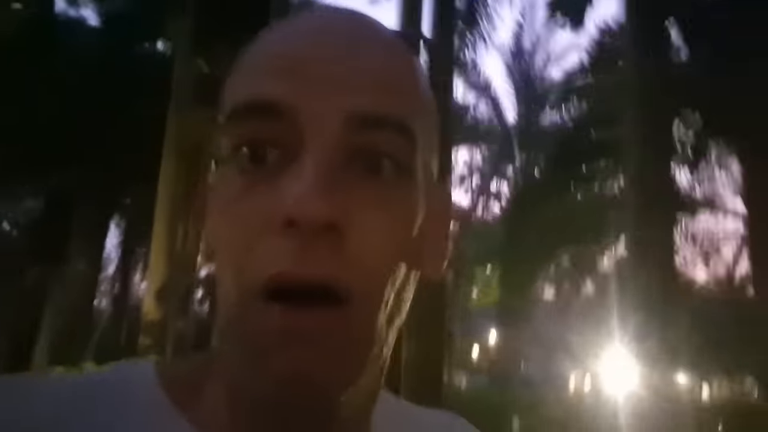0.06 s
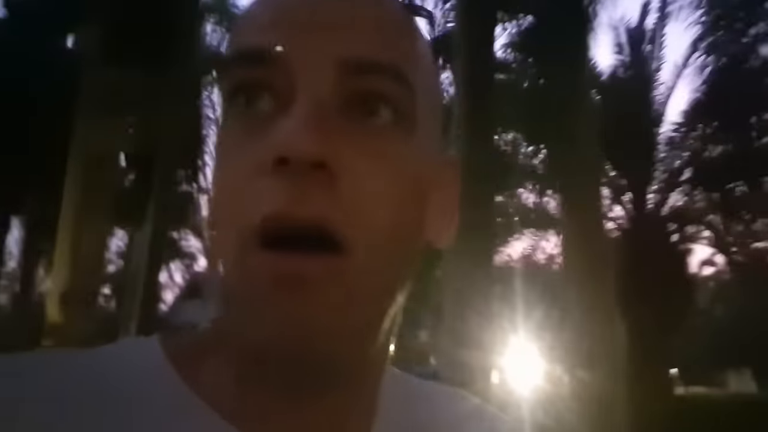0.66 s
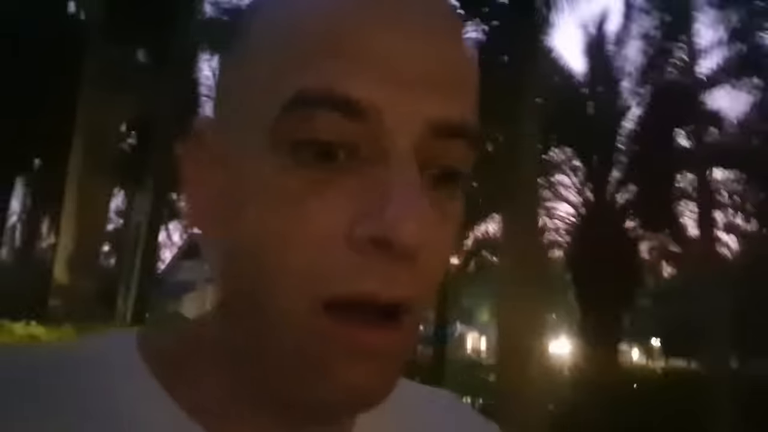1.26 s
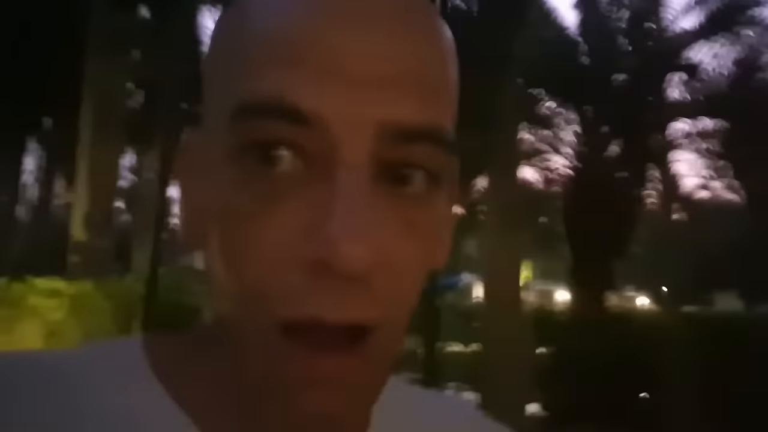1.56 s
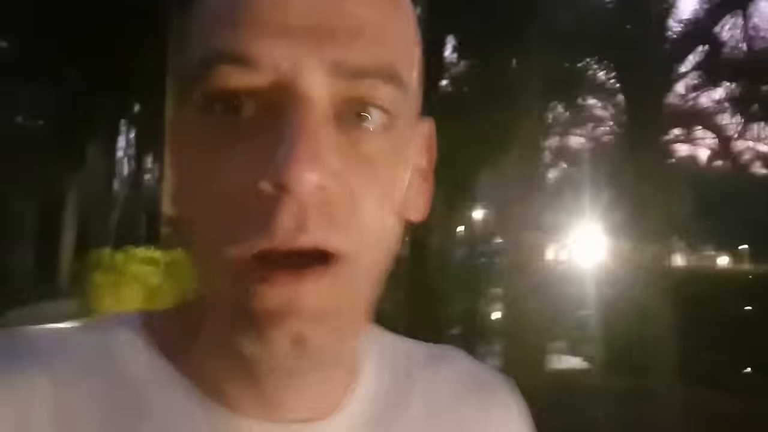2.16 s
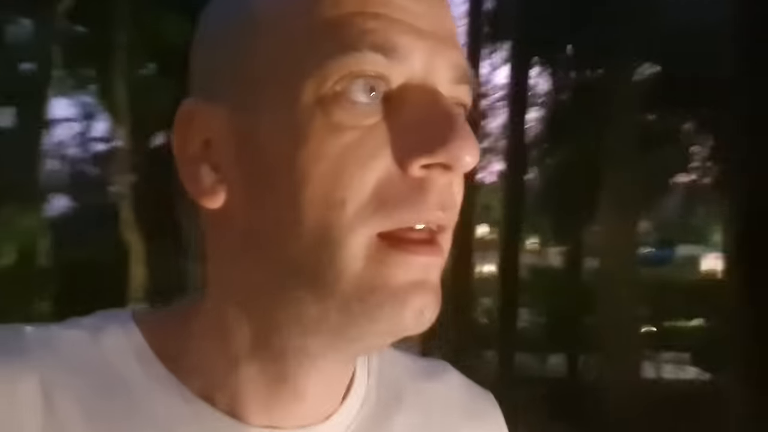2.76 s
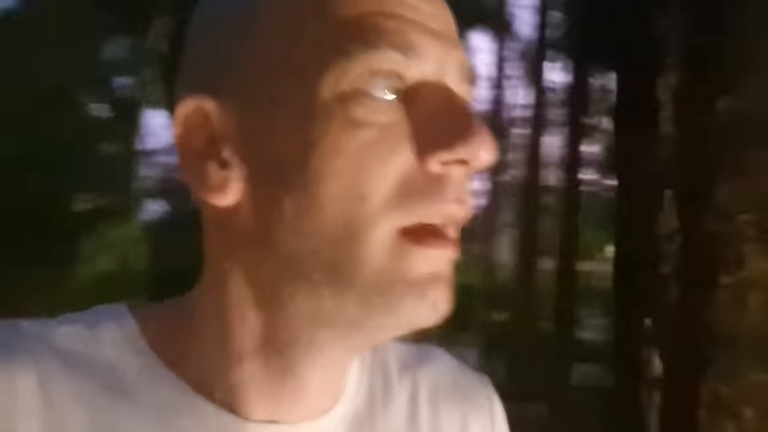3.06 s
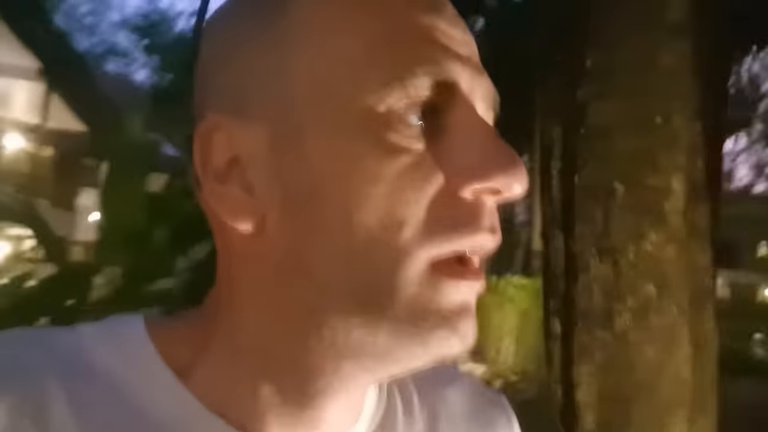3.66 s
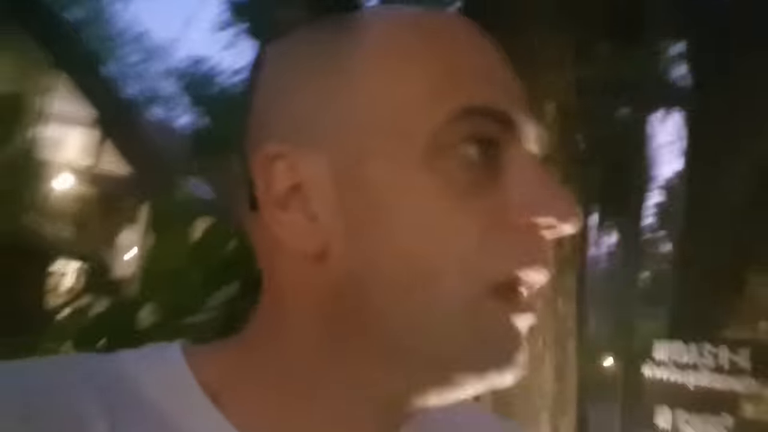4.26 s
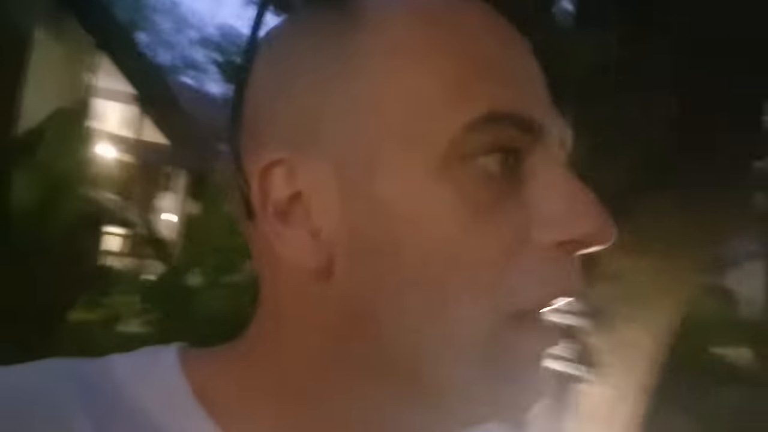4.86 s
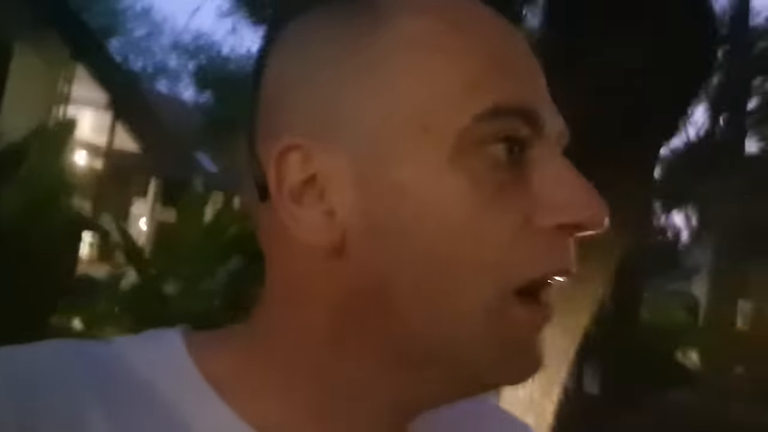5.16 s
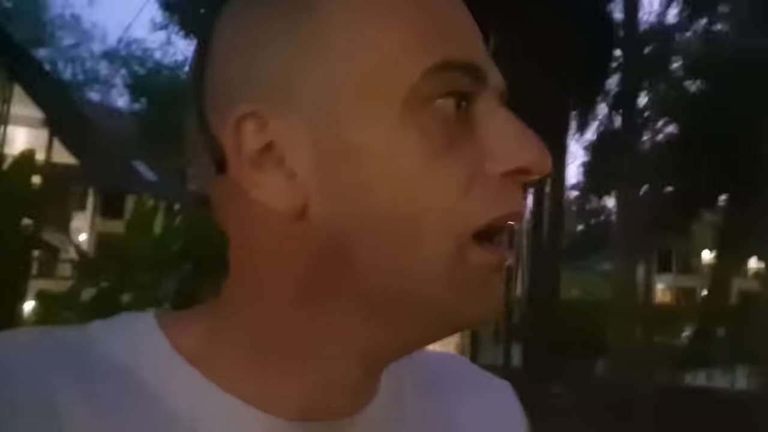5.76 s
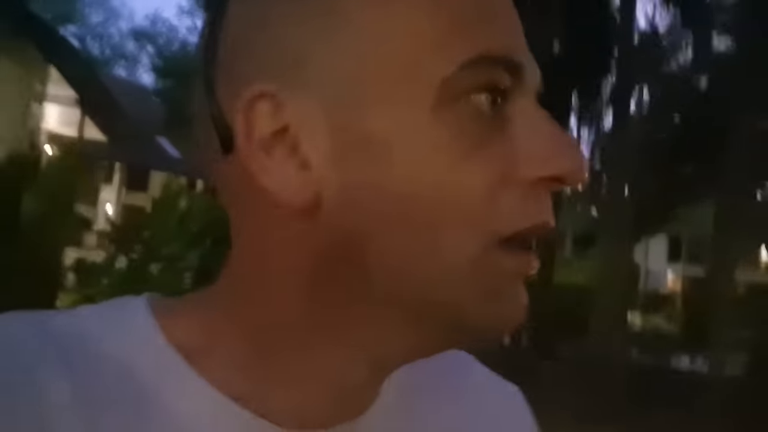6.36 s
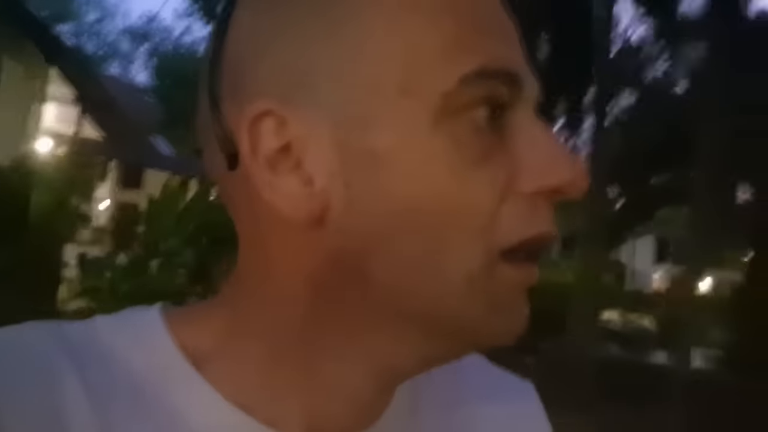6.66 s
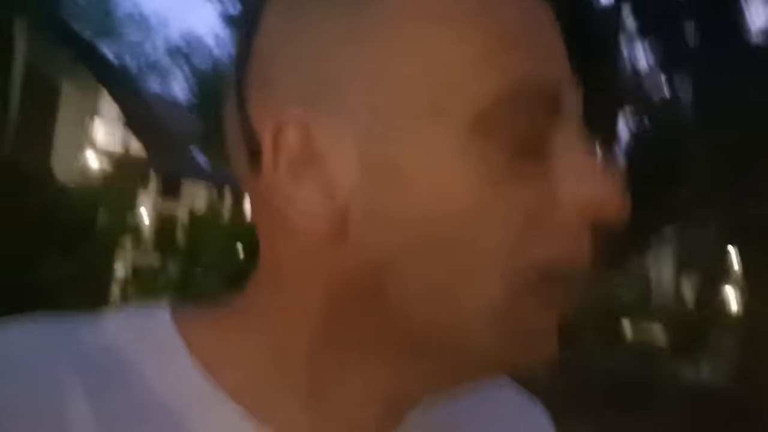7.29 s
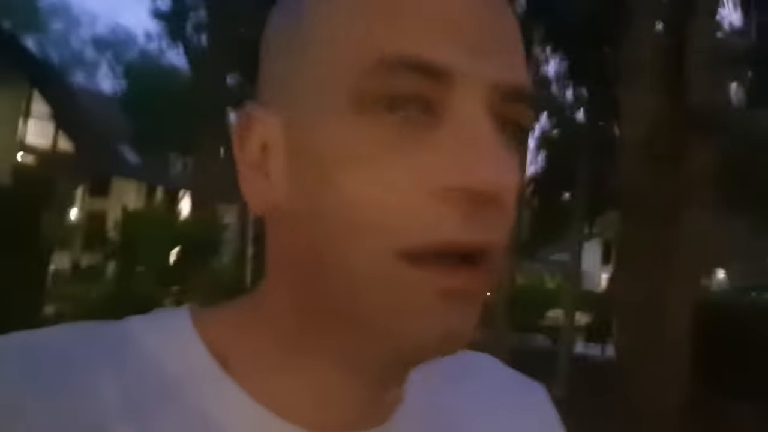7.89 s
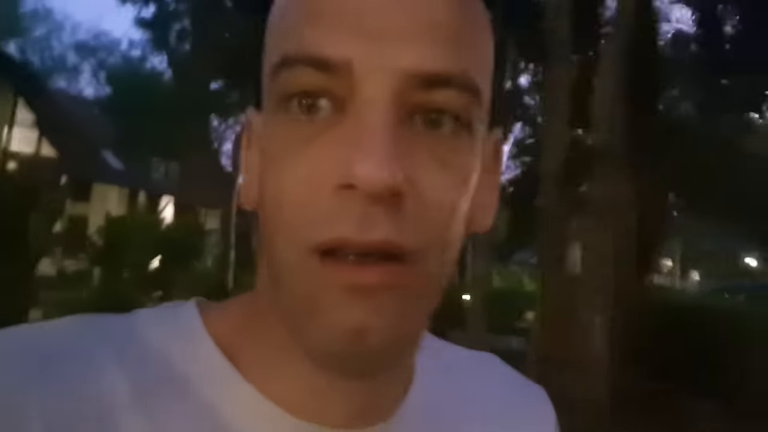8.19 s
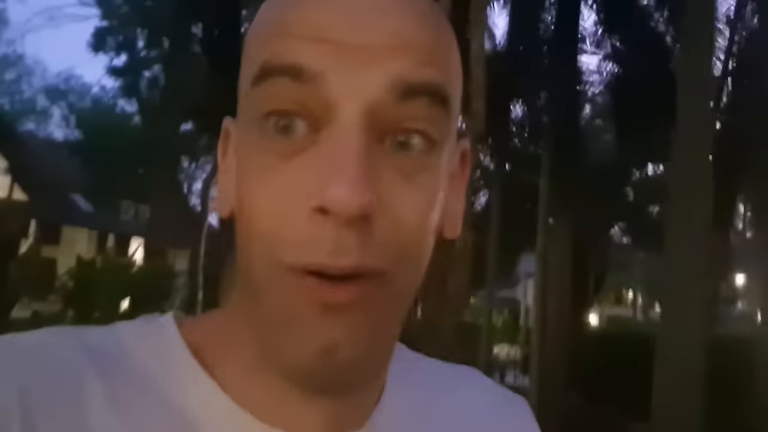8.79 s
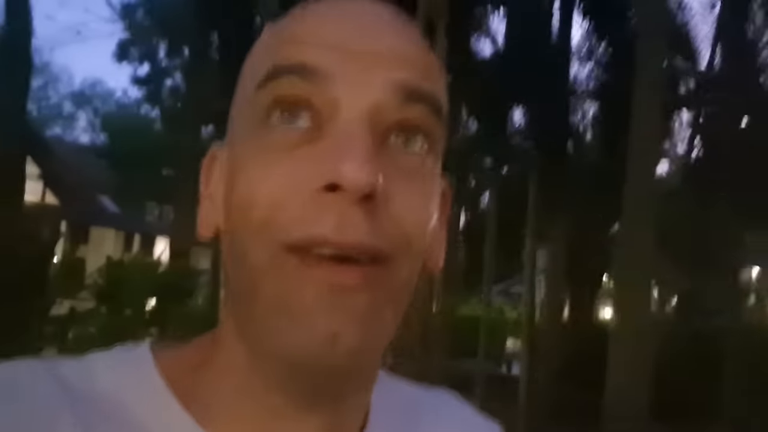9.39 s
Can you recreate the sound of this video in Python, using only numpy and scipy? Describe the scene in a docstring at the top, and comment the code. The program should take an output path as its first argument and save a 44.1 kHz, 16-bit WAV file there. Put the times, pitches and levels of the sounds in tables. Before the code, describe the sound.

Cicadas drone and sizzle loudly without a break, over soft footfalls, a faint hum and light microphone rumble.

```python
"""A dawn chorus of cicadas shrills from the trees all round someone walking a tropical garden with a phone.
Each insect buckles its tymbals hundreds of times a second and every click rings its hollow body.
Four kinds of singer stack up as drone, shrill, rasp and sizzle, and the trunks scatter their song.
Far below lie a mains hum, soft footfalls and a low background rumble, with deep swells of wind
or handling on the microphone."""
import sys
import numpy as np
from scipy import signal
from scipy.fft import rfft, irfft, next_fast_len
from scipy.io import wavfile
from scipy.ndimage import uniform_filter1d, map_coordinates

SR = 44100
rng = np.random.default_rng(int(sys.argv[2]) if len(sys.argv) > 2 else 0)


def pcm_store(signal):
    """Save signal as 16-bit PCM."""
    levels = np.round(np.clip(np.atleast_2d(signal), -1, 1) * 32767)
    wavfile.write(sys.argv[1], SR, levels.astype(np.int16).T)


N = 415863
T = np.arange(N) / SR
SIDES = np.array([[.5], [-.5]])  # each microphone port's share of a left-minus-right level
# the walker's steps: t/s, level/dB, heel knock trim/dB, jolt of the deep rumble/dB
STEPS = [(0.3, -33, -5, 3), (0.916, -34, 0, 1), (1.492, -26, -9, 4), (2.071, -25.5, -6, 9),
         (2.66, -28, -7.5, 6), (3.218, -25, -14, 9), (3.793, -28, -21, 9), (4.268, -35.5, 8, 1),
         (4.361, -29, -20, -1), (4.948, -30, -8, 5), (5.535, -30, -21, -1), (6.125, -30, -21, 2),
         (6.699, -27, -19, 5), (7.297, -26, -13, 6), (7.871, -28.5, -25, 4), (8.44, -29.5, -17, 0),
         (8.945, -20, -4, 2), (9.028, -14.5, -14, -1)]


def undb(db):
    """Decibels to gain."""
    return 10 ** (np.asarray(db) / 20)


def unit(x):
    """Scale a sound so that its mono mix has rms 1."""
    return x / np.sqrt(np.mean(np.atleast_2d(x).mean(axis=0) ** 2))


def curve(rows):
    """Automation lane: straight lines between (time, value) points."""
    return np.interp(T, *np.transpose(rows))


def drift(rate):
    """Random modulation with `rate` points a second and a spread near 1."""
    knots = rng.standard_normal(4096)
    return 1.2 * np.interp(T * rate, np.arange(len(knots)), knots)


def flutter(rate):
    """Random modulation with its slow part taken out."""
    wobble = drift(rate)
    return wobble - uniform_filter1d(wobble, int(4 * SR / rate))


def colour(x, points, share=1):
    """Equalise by a curve of (Hz, dB) points, or by a share of it."""
    size = next_fast_len(N)
    hz, db = np.transpose(points)
    bin_hz = np.maximum(np.arange(size // 2 + 1) * SR / size, 1)
    gain = undb(share * np.interp(np.log(bin_hz), np.log(hz), db))
    return irfft(rfft(x, size) * gain, size)[..., :N]


def cut(x, hz, kind, order):
    """Butterworth filter."""
    return signal.sosfilt(signal.butter(order, hz, kind, fs=SR, output="sos"), x)


def tymbal(click_hz, jitter, wander, scatter_db, count=13000):
    """A train of buckling clicks; the pace wanders, and each click is a little off in time and force."""
    slip, force = rng.standard_normal((count, 2)).T
    cycles = np.cumsum(click_hz * np.exp(wander * drift(18))) / SR
    at = np.searchsorted(cycles, np.cumsum(np.exp(jitter * slip)))
    return np.bincount(at[at < N], undb(scatter_db * force)[at < N], N)


def body(modes, pitch, size=700):
    """One insect's ring, higher if it is small: tymbal and air sac couple, so it swells and dies in ms."""
    t = np.arange(size) / SR
    ring = 0
    for hz, width, db in modes:
        decay = np.pi * width
        envelope = undb(db) * decay ** 2 * t * np.exp(-decay * t)
        ring = ring + envelope * np.sin(2 * np.pi * (pitch * hz * t + rng.random()))
    return ring


def trees(x, t60, size=8192):
    """Trunks and crowns scatter the song to each port by countless paths that shift along the walk."""
    t = np.arange(2 * size) / SR
    fade = np.exp(-np.log(1000) * t / t60)
    window = np.sin(np.pi * np.arange(size) / size)
    x = np.pad(x, 2 * size, mode="reflect")  # the air is already full of song at the start
    wet = np.zeros((2, len(x) + 2 * size))
    for i in range(0, len(x) - size, size // 2):
        paths = rng.standard_normal((2, len(t))) * fade
        echo = signal.fftconvolve((x[i:i + size] * window)[None], paths, axes=1)
        wet[:, i:i + echo.shape[1]] += echo
    return wet[:, 2 * size:2 * size + N]


def cicadas(modes, count, click_hz, jitter, scatter_db, detune, flutter_db, wet_db, lowest_hz):
    """Several singers of one kind, each with its own click rate, size, flutter and side."""
    # how much louder the left port hears than the right: f/Hz, level/dB
    port_balance = [(1200, -0.5), (1750, -1.5), (2400, -1), (3200, 5.5), (3900, 4.5), (4550, 2),
                    (5500, 6.5), (6900, 7), (8000, 17.5), (9000, 3.5), (10300, 5.5), (11900, 1.5),
                    (13000, 2), (15500, 9)]
    near = np.zeros((2, N))
    for k, pitch in enumerate(1 + detune * np.linspace(-1, 1, count)):
        clicks = tymbal(click_hz * rng.uniform(.7, 1.3), jitter, wander=.04, scatter_db=scatter_db)
        effort = undb(flutter_db * flutter(32))
        near[k % 2] += unit(signal.oaconvolve(clicks * effort, body(modes, pitch))[:N])
    song = unit(near) + undb(wet_db) * unit(trees(near.sum(axis=0), t60=0.55))
    song = cut(song, lowest_hz, "highpass", order=6)  # a small body radiates no bass
    return unit(colour(song, port_balance, SIDES))


def glints(x, depth_db, patch_hz, patch_s):
    """As the phone moves, reflections add and cancel: narrow patches of the spectrum glint briefly."""
    frames = dict(fs=SR, nperseg=512, noverlap=384)
    hz, s, spectrum = signal.stft(x, **frames)
    grid = np.meshgrid(hz / patch_hz, s / patch_s, indexing="ij")
    patches = map_coordinates(rng.standard_normal((256, 1024)), grid, order=1, mode="wrap")
    gain = undb(depth_db * patches)
    gain /= np.sqrt(np.mean(gain ** 2))
    return signal.istft(spectrum * gain, **frames)[1][:, :N]


def chorus(throb_hz=6, throb_db=0.26, flicker_db=0.26, build_db=2.5, build_s=2.2):
    """Drone, shrill and rasp ride one slow swell, each wavering its own way; sizzle follows the rasp."""
    # body resonances of each kind of singer: f/Hz, width/Hz, level/dB
    drone_modes = [(1530, 200, -6), (1767, 370, -1), (2070, 870, -8)]
    shrill_modes = [(3146, 317, -3), (3386, 585, 1), (3796, 760, -4.5), (4203, 700, -6.5)]
    rasp_modes = [(5013, 790, 0), (5533, 710, 0), (6350, 1420, -6.5), (7264, 860, -8.5),
                  (10300, 3100, -24.5)]
    sizzle_modes = [(11910, 1840, -1), (12900, 1500, 0), (14630, 1100, -2.5), (15200, 1300, -6)]
    # slow swell of the chorus along the path: t/s, level/dB
    swell = [(0, 0), (.5, 0.7), (1.65, -.5), (2.15, 1), (2.65, 1.5), (3.3, -1.3), (3.62, 0), (5.53, -1.2),
             (5.75, 1), (6.3, -0.3), (7.1, 0), (8.4, -0.74), (9.43, -0.4)]
    drone = cicadas(drone_modes, count=8, click_hz=220.1, jitter=.12, scatter_db=1.5,
                    detune=.023, flutter_db=1, wet_db=-7, lowest_hz=1341)
    shrill = cicadas(shrill_modes, count=10, click_hz=359.6, jitter=.04, scatter_db=1,
                     detune=.028, flutter_db=1, wet_db=-8, lowest_hz=2370)
    rasp = cicadas(rasp_modes, count=12, click_hz=501, jitter=.035, scatter_db=1.5,
                   detune=.011, flutter_db=1, wet_db=-7, lowest_hz=2350)
    sizzle = cicadas(sizzle_modes, count=12, click_hz=799, jitter=.18, scatter_db=0,
                     detune=.035, flutter_db=5.5, wet_db=-3, lowest_hz=8650)
    swell_db = curve(swell)
    drone_db = swell_db + .5 * flutter(14)
    shrill_db = .19 * swell_db + .65 * flutter(17)
    shrill_db -= build_db * np.exp(-T / build_s)  # starts a little soft and builds
    rasp_db = swell_db + .74 * flutter(16)
    songs = drone * undb(drone_db - 28.5) + shrill * undb(shrill_db - 18) + rasp * undb(rasp_db - 20.5)
    songs = glints(songs, depth_db=2.5, patch_hz=200.7, patch_s=.016)
    songs += sizzle * undb(1.14 * rasp_db - 29.5)
    pump = -np.cos(2 * np.pi * throb_hz * T)  # the singers pump their abdomens in step
    return songs * undb(throb_db * pump + flicker_db * flutter(44))


def mains_hum(hz=100, trim_db=-3, waver_db=3):
    """A pure low mains tone that wavers, coming and going along the path."""
    # fader ride of the hum: t/s, level/dB
    ride = [(0, -45.5), (.85, -43), (1.2, -57), (1.8, -41), (2.5, -48), (2.95, -38), (4.7, -48), (7, -45.5),
            (8.75, -38), (9.3, -52)]
    tone = unit(np.sin(2 * np.pi * hz * T))
    return tone * undb(trim_db + curve(ride) + waver_db * flutter(12))


def rumble(deep_db=-48.5, upper_db=-46, spread_db=1, jolt_lag_s=.035, jolt_s=.085):
    """Low background rumble, with deep swells of wind or handling on the microphone and jolts of steps."""
    # spectrum of the rumble: f/Hz, level/dB
    spectrum = [(20, -12), (45, 2.5), (80, 2), (150, -5), (220, -14), (400, -20), (700, -23.5), (1100, -26),
                (2000, -61)]
    # swells of wind or handling: t/s, rise/dB, half length/s
    swells = [(2.5, 8, .35), (9.02, 18.5, 0.15)]
    noise = rng.standard_normal(N) + undb(spread_db) * rng.standard_normal((2, N))  # centre plus width
    air = unit(colour(noise, spectrum))
    jolt_db = sum(db * np.exp(-((T - s - jolt_lag_s) / jolt_s) ** 2) for s, _, _, db in STEPS)
    swell_db = sum(db * np.exp(-((T - s) / half) ** 2) for s, db, half in swells)
    deep = cut(air, 86, "lowpass", order=3) * undb(deep_db + jolt_db + swell_db + 1.8 * flutter(5.5))
    upper = cut(air, 101, "highpass", order=3) * undb(upper_db + 1.2 * drift(3.5))
    return deep + upper


def footfalls(thud_hz=(40, 150), knock_hz=(210, 350), thud_t60=.13, knock_t60=.053, thud_db=-1):
    """Each soft step is a low thud with a short knock of the heel."""
    track = np.zeros(N + SR)
    t = np.arange(SR // 3) / SR
    for s, db, heel_db, _ in STEPS:
        noise = rng.standard_normal((2, len(t)))
        thud = cut(noise[0] * np.exp(-np.log(1000) * t / thud_t60), thud_hz, "bandpass", order=2)
        knock = cut(noise[1] * np.exp(-np.log(1000) * t / knock_t60), knock_hz, "bandpass", order=2)
        step = undb(thud_db) * thud / abs(thud).max() + undb(heel_db) * knock / abs(knock).max()
        start = int((s - .00892) * SR)  # the sole touches just before the weight comes down
        track[start:start + len(t)] += undb(db) * step
    return track[:N]


def scene(lean_db=4):
    """The chorus all round; the low sounds lean to the left."""
    return chorus() + (footfalls() + mains_hum() + rumble()) * undb(lean_db * SIDES)


def record(dry, top_hz=15700):
    """The rare highest peaks are clipped and the top treble is cut."""
    lowpass = signal.ellip(12, .1, 70, top_hz, fs=SR, output="sos")
    return signal.sosfilt(lowpass, np.clip(dry, -1, 1))


dry = scene()
out = record(dry)
pcm_store(out)
```